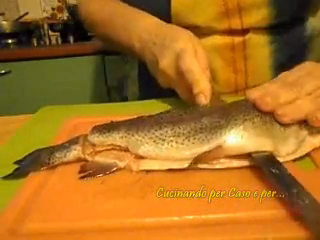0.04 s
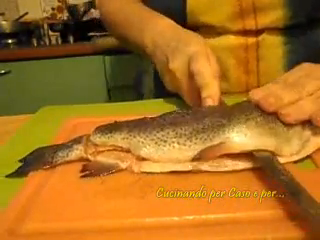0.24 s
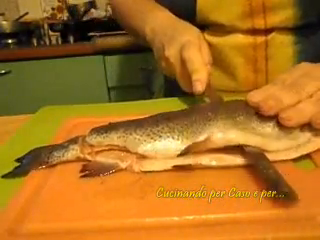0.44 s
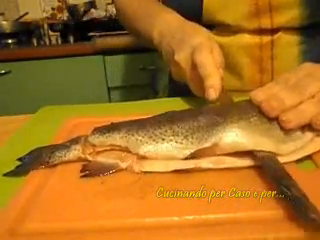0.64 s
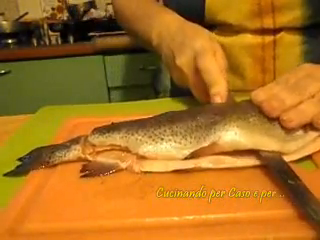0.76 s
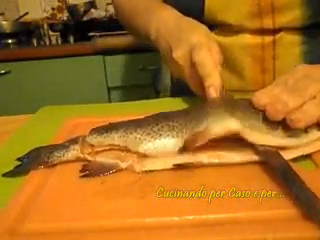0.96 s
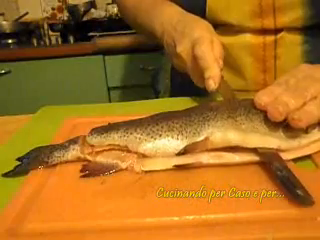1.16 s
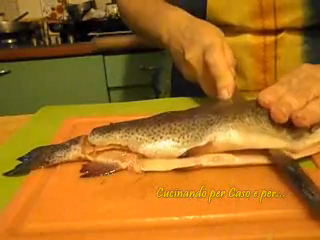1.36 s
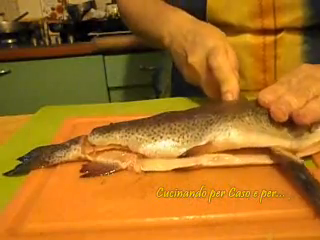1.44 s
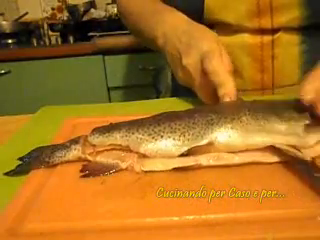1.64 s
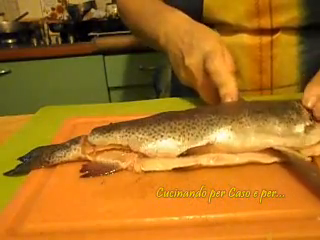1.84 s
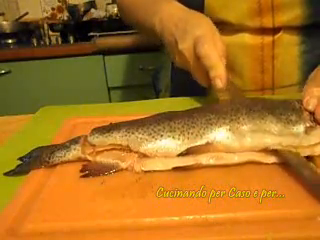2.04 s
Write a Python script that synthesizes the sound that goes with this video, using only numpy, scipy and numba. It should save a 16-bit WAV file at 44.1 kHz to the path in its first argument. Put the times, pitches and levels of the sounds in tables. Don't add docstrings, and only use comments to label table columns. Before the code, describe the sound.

Knife cutting against fish bones, gritty chattering scrapes and crisp cracks on a plastic board.

```python
import sys
import numpy as np
from scipy import signal
from scipy.fft import rfft, irfft
from scipy.io import wavfile
from scipy.ndimage import uniform_filter1d
from numba import njit

SR = 44100
rng = np.random.default_rng(int(sys.argv[2]) if len(sys.argv) > 2 else 0)


def materialize(psi):
    bounded = np.clip(np.atleast_2d(psi).T, -1, 1)
    quanta = np.round(bounded * 32767).astype(np.int16)
    wavfile.write(sys.argv[1], SR, quanta)


def elevation(decibels):
    levels = np.asarray(decibels, float)
    return 10 ** (levels / 20)


N = 92610


@njit
def bandpass(x, hz, width_hz):
    y, band, low = np.empty(len(x)), 0., 0.
    for i in range(len(x)):
        g, damping = np.tan(np.pi * hz[i] / SR), width_hz / hz[i]
        v = (band + g * (x[i] - low)) / (1 + g * (g + damping))
        band, low, y[i] = 2 * v - band, low + 2 * g * v, damping * v
    return y


def unit(x):
    return x / np.sqrt(np.mean(x ** 2))


def ring(x, modes, pitch=0.99):
    out = 0
    for k, (hz, width_hz, db) in enumerate(modes):
        gain = (-1) ** k * elevation(db) / np.sqrt(width_hz)
        out = out + gain * bandpass(x, hz * pitch * np.ones(N), 1. * width_hz)
    return out


def ring_gated(x, envelope, modes, pitch=1.):
    return ring(x * envelope, modes, pitch) / np.std(ring(x, modes, pitch))


def walk(rate_hz):
    hold = int(SR / rate_hz)
    return unit(uniform_filter1d(np.repeat(rng.standard_normal(N // 50), hold)[:N], hold))


def gates(rows):
    attack_s, release_s = 0.016, 0.018
    t = np.arange(N) / SR
    out = []
    for start_s, length_s in rows[:, :2]:
        attack = np.clip((t - start_s) / attack_s, 0, 1)
        out.append(attack * np.exp(-np.maximum(t - start_s - length_s, 0) / release_s))
    return np.array(out)


def strike(start_s, peak_db, shapes):
    out = np.zeros(N + 4096)
    for s, db, shape in zip(start_s, peak_db, shapes):
        i = int(s * SR)
        out[i:i + len(shape)] += elevation(db) * shape / np.abs(shape).max()
    return out[:N]


def slips():
    slips_per_s, scatter_db, cap_db = 4000, -1, 9
    grip_db, grip_per_s = 3, 80
    chance, size, sign = rng.random((N, 3)).T
    size_db = cap_db * np.tanh(-scatter_db * np.log(size + 1e-9) / cap_db)
    pulses = (chance < slips_per_s / SR) * elevation(size_db) * np.sign(sign - .5)
    return pulses * elevation(grip_db * np.tanh(walk(grip_per_s)))


# start_s, length_s, level_db, pitch_hz (free blade bending), scrape_db (edge)
STROKES = [(0, 0.14, -42, 1070, -35), (0.162, 0.16, -29.5, 1023, -32.5), (0.418, 0.05, -32.5, 1140, -28.5),
           (0.478, 0.06, -32.5, 1230, -30), (0.538, 0.051, -33, 1147, -28.5),
           (0.586, 0.046, -66, 1110, -34), (0.702, 0.085, -31, 1120, -32), (0.811, 0.041, -28, 1196, -29),
           (0.864, 0.047, -29, 1150, -29.5), (0.923, 0.058, -28.5, 1234, -33.5),
           (1.049, 0.11, -38, 1255, -35), (1.131, 0.071, -26, 1283, -28.5),
           (1.204, 0.062, -24.5, 1370, -25.5), (1.279, 0.03, -54, 1230, -35),
           (1.346, 0.078, -39, 1320, -34.5), (1.412, 0.056, -34, 1360, -34), (1.489, 0.027, -28, 1230, -27),
           (1.525, .024, -25, 1350, -25.5), (1.575, 0.047, -28.5, 1376, -29.5),
           (1.639, 0.031, -32, 1420, -33), (1.787, 0.16, -40, 1325, -40.5), (2.073, 0.045, -41, 1170, -37)]
# pitch_ratio, width_hz, level_db
BLADE_BENDING = [(0.418, 262, -7), (.68, 208, -4.5), (1.006, 113, 2), (1.55, 180, -8.5), (2.2, 212, -11)]
# pitch_hz, width_hz, level_db
BLADE_EDGE = [(4287, 1000, -2.5), (5080, 280, 0.5), (5770, 1800, 0.5), (5976, 234, 0), (6660, 650, -14),
              (8070, 300, -8.5), (9700, 1200, -6)]
# pitch_hz, width_hz, level_db
BOARD = [(110.5, 8.1, -17), (204, 27, -1), (247, 47, 0), (489, 110, 0.5)]


def strokes():
    rumble_db = -23
    rows = np.array(STROKES)
    start_s, length_s, level_db, pitch_hz, scrape_db = rows.T
    pitch = np.interp(np.arange(N) / SR, start_s + length_s / 2, pitch_hz)
    pitch = pitch * (1 + 0.054 * walk(30.36))
    gate = gates(rows)
    push, scrape = elevation(level_db) @ gate, elevation(scrape_db) @ gate
    blade_slips, edge_slips = slips(), slips()
    bending = ring_gated(blade_slips, push, BLADE_BENDING, pitch)
    edge = ring_gated(edge_slips, scrape, BLADE_EDGE)
    rumble = elevation(rumble_db) * ring_gated(blade_slips, push, BOARD)
    return bending + edge + rumble


# pitch_hz, level_db (per Hz)
KITCHEN = [(24, -58), (40, -16.5), (160, -21.5), (260, -7.5), (409, -2.5), (711, -1), (1000, -1.5),
           (2300, -4.5), (9800, -12.5), (12700, -48), (21600, -120)]


def kitchen():
    level_db = -34
    f = np.fft.rfftfreq(N, 1 / SR) + 1
    curve_hz, curve_db = np.array(KITCHEN).T
    tilt = elevation(np.interp(np.log(f), np.log(curve_hz), curve_db))
    out = 0
    for hz in 30 * 2. ** np.arange(9):
        octave = np.clip(1 - np.abs(np.log2(f / hz)), 0, 1) ** .5
        flicker = elevation((1.5 + 150 / hz) * walk(11.96))
        out = out + flicker * irfft(rfft(rng.standard_normal(N)) * tilt * octave, N)
    return elevation(level_db) * unit(out)


# time_s, level_db
LEAN = [(0.0, -60), (0.33, -51.5), (0.41, -74), (0.5, -54), (0.75, -58), (0.97, -44.5), (1.09, -65),
        (1.12, -58.5), (1.42, -54.5), (1.44, -45), (1.48, -58), (1.54, -38.5), (1.57, -50), (1.65, -41),
        (1.69, -62), (1.77, -49), (1.91, -65), (2.1, -53)]
# pitch_hz, width_hz, level_db
TABLE_MODES = [(70, 25, -11), (109.7, 14.6, 1)]


def table():
    time_s, level_db = np.array(LEAN).T
    lean_db = np.interp(np.arange(N) / SR, time_s, level_db)
    return elevation(lean_db) * unit(ring(rng.standard_normal(N), TABLE_MODES))


# start_s, length_s, level_db, pitch_hz, width_hz
TWISTS = [(0.852, 0.054, -31.5, 1840, 100), (0.468, 0.045, -32, 1980, 250), (0.541, 0.033, -31, 1950, 150),
          (0.94, 0.014, -35, 2900, 130), (1.135, 0.016, -23, 2150, 300), (1.155, 0.035, -28, 2720, 150),
          (1.22, 0.019, -25, 2870, 190), (1.245, 0.014, -37, 3020, 240), (1.215, 0.036, -29.5, 1850, 360),
          (1.288, 0.013, -26, 3150, 270), (1.525, 0.021, -32, 1830, 190), (0.69, .015, -36, 5180, 120),
          (0.72, .015, -32, 6010, 120), (0.98, .015, -36, 2900, 170), (1.6, 0.02, -31, 5020, 52),
          (1.42, 0.028, -33, 6010, 80), (1.6, 0.028, -45, 5020, 91), (0.477, 0.03, -31, 5100, 200),
          (0.024, .1, -37, 2020, 1300), (.568, 0.0092, -28, 1175, 80), (1.15, 0.076, -34, 8500, 1500),
          (1.265, 0.014, -23, 7900, 350), (1.5, .015, -27, 9350, 800), (.725, .006, -27, 4500, 560),
          (.49, 0.022, -31.5, 1130, 150)]


def twists():
    rows, chatter = np.array(TWISTS), slips()
    out = 0
    for gate, (level_db, hz, width_hz) in zip(gates(rows), rows[:, 2:]):
        out = out + ring_gated(chatter, elevation(level_db) * gate, [(hz, width_hz, 0)])
    return out


# start_s, thud_peak_db, tick_peak_db
KNOCKS = [(.09, -30, -17), (0.268, -21.5, -5), (0.307, -31, -24), (0.32, -21.5, -6.5), (0.59, -26, 1.5),
          (.82, -15, -15), (0.867, -15.5, -18), (0.906, -34, -5.5), (.936, -17, -3.5), (0.959, -20, -16),
          (1.234, -30, -7), (1.416, -23, -19), (1.5, -19, -3), (1.536, -19.5, -32), (1.572, -15, -8.5),
          (1.607, -20.5, -18), (1.617, -23, -10), (1.63, -20, -22), (1.791, -43, -19), (1.867, -50, -25),
          (2.039, -53, -13.5), (1.2755, -50, -1), (1.19, -23, -23)]


def knocks():
    thud_gain_db, thud_cut_hz = -7, 142
    tick_gain_db, tick_hz, tick_width_hz = -8.5, 1070, 990
    start_s, thud_db, tick_db = np.array(KNOCKS).T
    hit = np.zeros(N)
    hit[:12] = np.hanning(12)
    highpass = signal.butter(2, thud_cut_hz, "high", fs=SR, output="sos")
    thud = signal.sosfilt(highpass, ring(hit, BOARD)[:4000])
    tick = ring(hit, [(tick_hz, tick_width_hz, 0)])
    tick = ring(tick, [(tick_hz, 2 * tick_width_hz, 0)])[:1000]
    thuds = strike(start_s, thud_db + thud_gain_db, [thud] * len(start_s))
    return thuds + strike(start_s, tick_db + tick_gain_db, [tick] * len(start_s))


def ring_twice(x, hz, width_hz):
    centre = np.full(len(x), 1. * hz)
    return bandpass(bandpass(x, centre, 1. * width_hz), centre, 4. * width_hz)


# start_s, peak_db, body_rel_db, body_pitch_hz
SNAPS = [(0.4331, -5.5, -7, 1900), (0.5529, -7.5, -14, 1110), (0.5899, 5.5, -13.5, 1163),
         (0.7295, 0, -14, 2950), (0.7603, -10, -5, 1150), (0.7854, -22, -11, 1140), (0.84, -7, -7, 1180),
         (0.8802, -7.5, -1.5, 1126), (0.9002, -13.5, 3, 1190), (0.942, -19.5, 1.5, 1270),
         (0.9872, -7, -12, 1230), (1.044, -9, -25, 1410), (1.124, -8.5, -11, 2140), (1.2531, -7, -21, 1430),
         (1.275, 10, -9, 3080), (1.34, -12.5, -17, 1820), (1.3813, -20.5, -3, 1360),
         (1.406, -11.5, -4, 1390), (1.4241, -5.5, -3.5, 1325), (1.4316, -8, -21, 1320),
         (1.512, -8, 3, 1790), (1.534, -12, -0.5, 1360), (1.5964, -2.5, -6, 1236),
         (1.6115, -4.5, -9.5, 1420), (1.6486, -28, 6, 1430), (1.6735, -19, -23, 1390),
         (1.7408, -19.5, -8, 1950), (1.769, -3, -22, 1370), (1.8249, -18, 1.5, 1270),
         (2.0742, -17.5, -23, 1310), (0.4355, -1.5, -13.5, 1250), (0.513, -17, -4, 1220),
         (.5575, -12, -7.5, 2030), (.574, -10, -6.5, 1150), (0.5782, -12, -10, 1170),
         (0.592, -4, -5.5, 1970), (.603, -12, -9, 1200), (0.7422, -11.5, -5, 1130), (.776, -28.5, 14, 1162),
         (0.8267, -19, -3, 1770), (1.142, -20, 7, 2120), (1.147, -16, -2, 1260), (1.176, -15, 4, 1260),
         (1.2, -18.5, 7, 1340), (1.2357, -12, 2, 2860), (1.279, -9, 2.5, 3170), (1.284, -23, -8, 2940),
         (1.287, -15.5, 0, 1280), (0.166, -25, 1, 1130), (0.208, -30, -4, 1070)]
# pitch_hz, width_hz, level_db
SNAP_RING = [(4250, 460, 0.5), (5010, 520, 4.5), (5880, 780, 6), (7000, 220, -16), (9450, 830, -19)]
CRACKS_DB = (-1, 0, -14)


def snaps():
    edge_gain_db, body_gain_db = -4, -1.5
    crumble_db, crumble_s, gap_s = -24.5, 0.0024, .0012
    bone_width_ratio, skirt_db = .12, -12.5
    t, k = np.arange(2048) / SR, np.arange(3)
    start_s, peak_db, body_db, body_hz = np.array(SNAPS).T
    edge, body = [], []
    for hz, c in zip(body_hz, rng.standard_normal((len(start_s), 2048))):
        x = elevation(crumble_db) * c * np.abs(c) * np.exp(-t / crumble_s)
        crack_at = (k * gap_s * SR * (1 + .15 * np.tanh(c[-3:]))).astype(int) + 4
        x[crack_at] += elevation(np.array(CRACKS_DB) + 2 * np.tanh(c[-6:-3]))
        rung = 0
        for j, (f, width_hz, db) in enumerate(SNAP_RING):
            gain = (-1) ** j * elevation(db + np.tanh(c[-9 - j])) / np.sqrt(width_hz)
            rung = rung + gain * ring_twice(x, f, width_hz)
        edge.append(rung)
        x = x * np.exp(-t / gap_s)
        skirt = elevation(skirt_db) * ring_twice(x, 1.364 * hz, .5 * hz)
        body.append(ring_twice(x, hz, bone_width_ratio * hz) + skirt)
    edges = strike(start_s, peak_db + edge_gain_db, edge)
    return edges + strike(start_s, peak_db + body_db + body_gain_db, body)


def room(near):
    t60_s, level_db = .25, -13
    t = np.arange(SR // 3) / SR
    tail = rng.standard_normal(len(t)) * elevation(-60 * t / t60_s) * (t > .004)
    return elevation(level_db) * signal.fftconvolve(near, tail / np.sqrt(np.sum(tail ** 2)))[:N]


def scene():
    near = strokes() + twists() + knocks() + snaps()
    return (near + room(near) + kitchen() + table())[None]


EDGE_HZ = 10000


def thin_treble(x):
    sparse_hz, dropped_db = 7150, -28
    turn_hz, keep_low = 8200, .6
    keep_bias, keep_loud = -0.11, .9
    weak_hz, weak_width_hz, weak = 7550, 250, .8
    line_db, line_rare, hole_rare = 3.5, 1, 1.8
    f, _, z = signal.stft(x, SR, nperseg=2048, noverlap=1536)
    f_col = f[:, None]

    def patch(tall, long):
        noise = np.repeat(rng.standard_normal(z.shape), tall, axis=0)[:len(f)]
        return unit(uniform_filter1d(noise, size=long, axis=1))

    busy = np.log(np.abs(z[(f > sparse_hz) & (f < EDGE_HZ)]).mean(axis=0) + 1e-9)
    busy = np.tanh(2 * (busy - np.median(busy)))
    high = np.tanh((f_col - turn_hz) / 200)
    odds = keep_bias - keep_low * high + keep_loud * busy * high
    odds = odds - weak * np.exp(-((f_col - weak_hz) / weak_width_hz) ** 2)
    lone = np.where(patch(tall=2, long=20) > line_rare, elevation(line_db), elevation(dropped_db))
    kept = np.where(patch(tall=12, long=9) + odds > 0, 1, lone)
    in_hole = patch(tall=10, long=5) > hole_rare + 900 / (f_col + 300)
    holes = np.where(in_hole, elevation(dropped_db / 2), 1)
    z = z * np.where(f_col > sparse_hz, kept, holes) * (f_col < EDGE_HZ)
    return signal.istft(z, SR, nperseg=2048, noverlap=1536)[1][:N]


def hiss_band(lo_hz, hi_hz):
    sos = signal.butter(8, [lo_hz, hi_hz], "band", fs=SR, output="sos")
    return unit(signal.sosfilt(sos, rng.standard_normal(N)))


# start_s, length_s
SWELLS = [
    (0.045, 0.087),
    (0.247, 0.051),
    (0.38, 0.022),
    (0.705, .02),
    (1.01, 0.013),
    (1.912, 0.12),
    (2.06, 0.012),
]


def air(x):
    level_db, quiet_db, follow = -62, 6, .9
    gap_hz, top_hz, ramp_s = 11200, 15450, 0.0037
    loud = np.sqrt(uniform_filter1d(np.minimum(x ** 2, .01), size=2048) + 1e-9)
    hiss = (loud / np.median(loud)) ** follow * hiss_band(gap_hz, top_hz)
    hiss += elevation(-16 + 8.5 * walk(13.9)) * hiss_band(9900, gap_hz)
    hiss += elevation(-8.0) * hiss_band(gap_hz, 11900)
    t = np.arange(N) / SR
    swell = 0
    for start_s, length_s in SWELLS:
        inside_s = np.minimum(t - start_s, start_s + length_s - t)
        swell = swell + np.clip(inside_s / ramp_s + 1, 0, 1)
    hiss += elevation(quiet_db) * swell * hiss_band(12000, 14400)
    return elevation(level_db) * hiss


def top_cut(x):
    return signal.sosfilt(signal.butter(12, 15640, fs=SR, output="sos"), x)


def record(dry):
    overload = .84
    held = np.clip(dry[0], -overload, overload)
    held = held + uniform_filter1d(dry[0] - held, size=48)
    x = thin_treble(held)
    return top_cut(np.clip(x + air(x), -1, 1)[None])


dry = scene()
out = record(dry)
materialize(out)
```